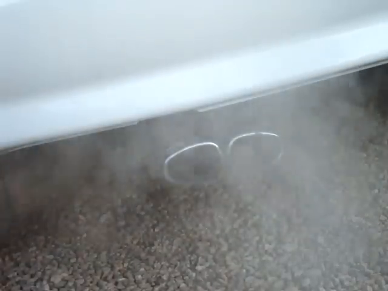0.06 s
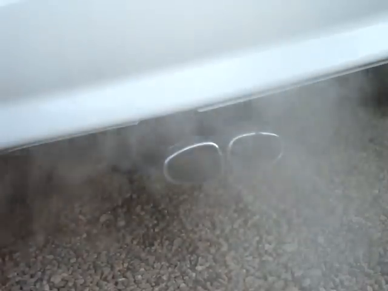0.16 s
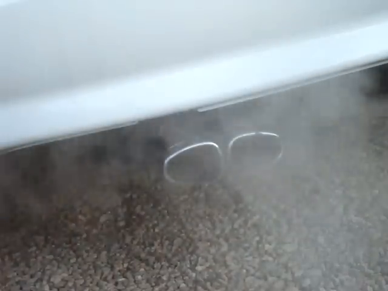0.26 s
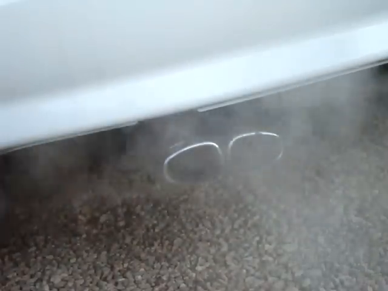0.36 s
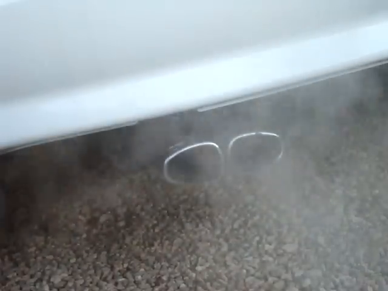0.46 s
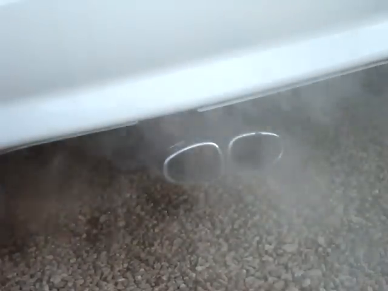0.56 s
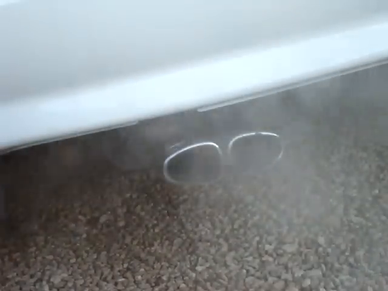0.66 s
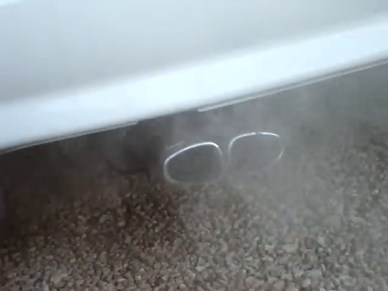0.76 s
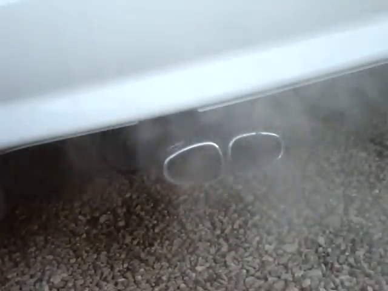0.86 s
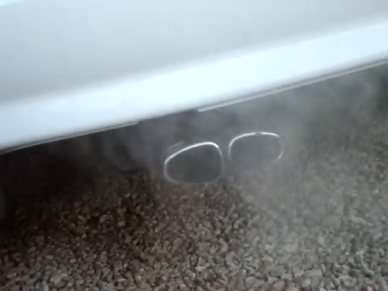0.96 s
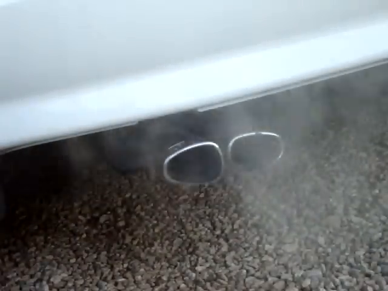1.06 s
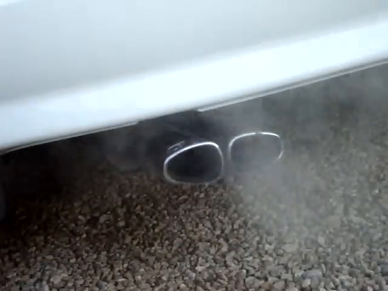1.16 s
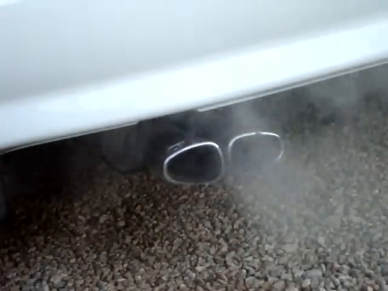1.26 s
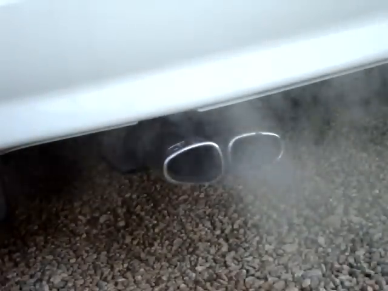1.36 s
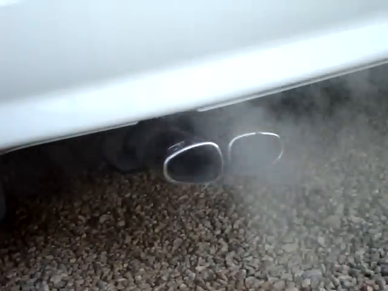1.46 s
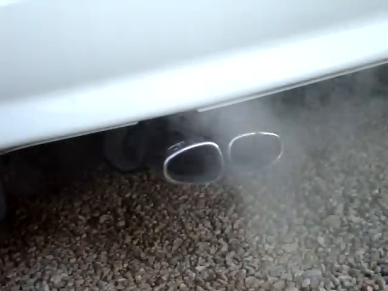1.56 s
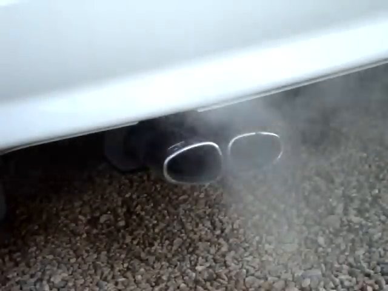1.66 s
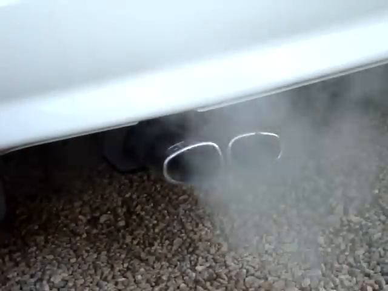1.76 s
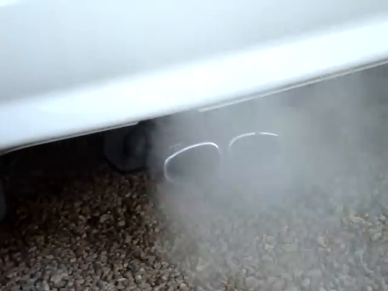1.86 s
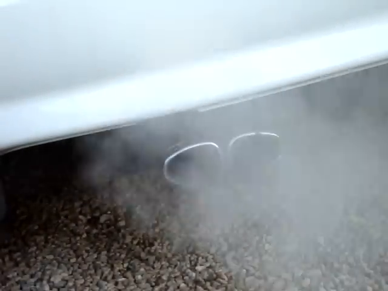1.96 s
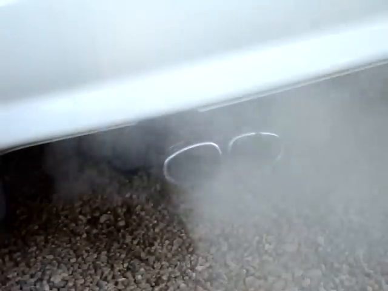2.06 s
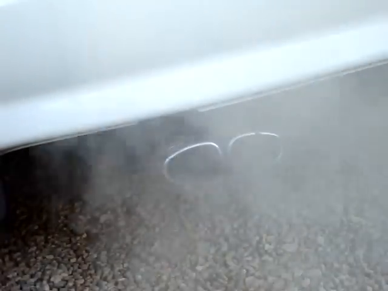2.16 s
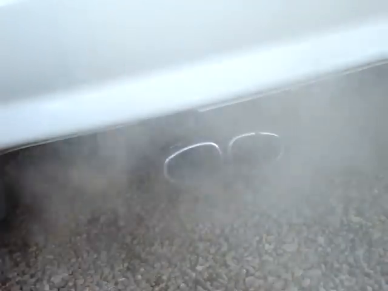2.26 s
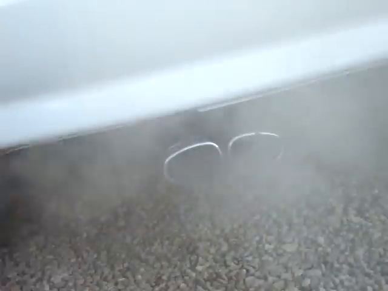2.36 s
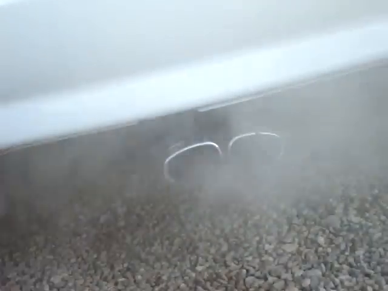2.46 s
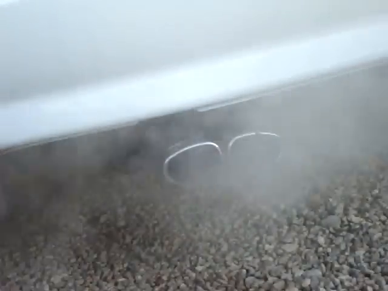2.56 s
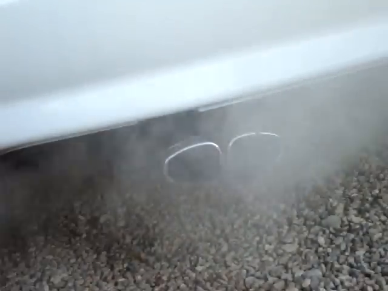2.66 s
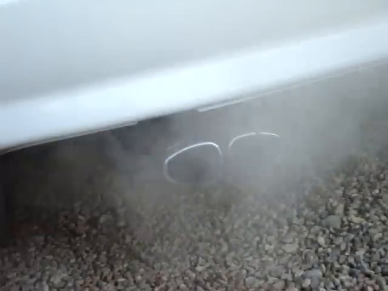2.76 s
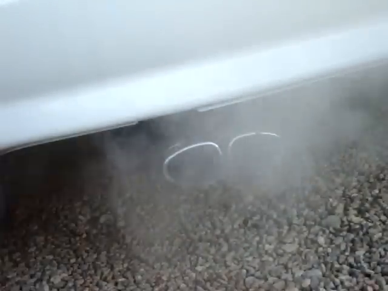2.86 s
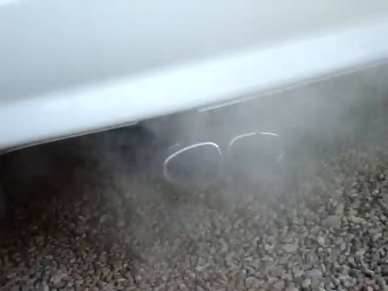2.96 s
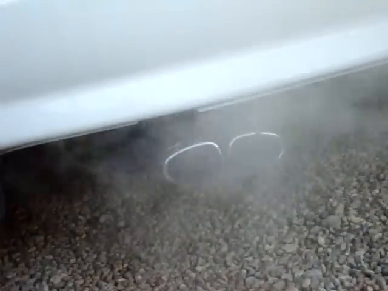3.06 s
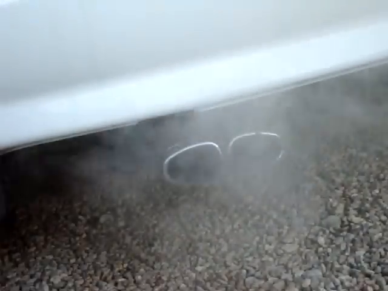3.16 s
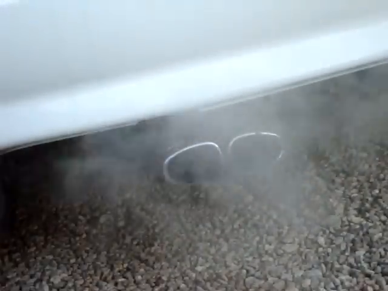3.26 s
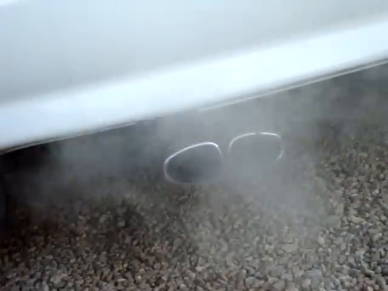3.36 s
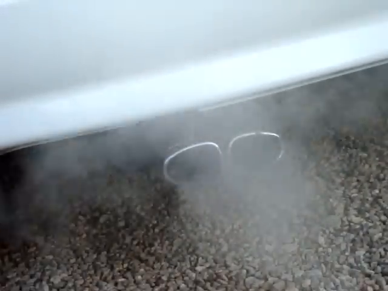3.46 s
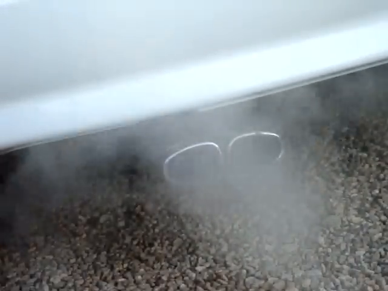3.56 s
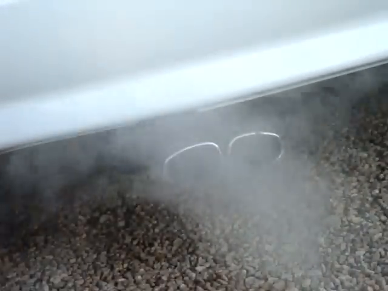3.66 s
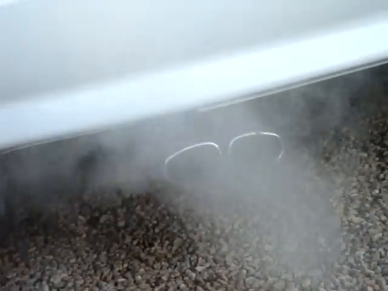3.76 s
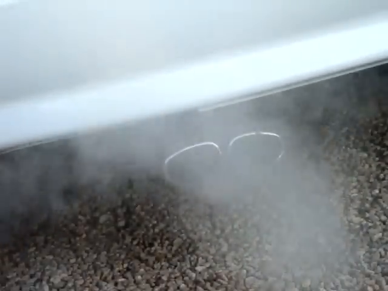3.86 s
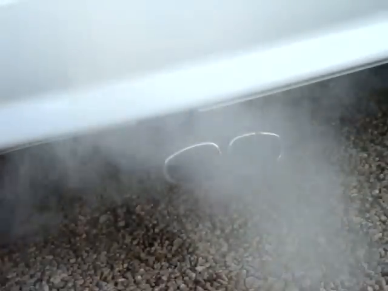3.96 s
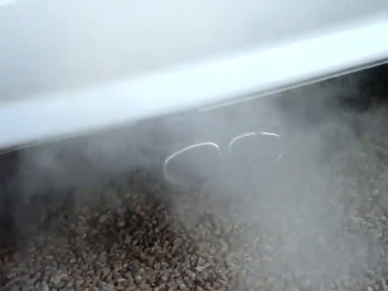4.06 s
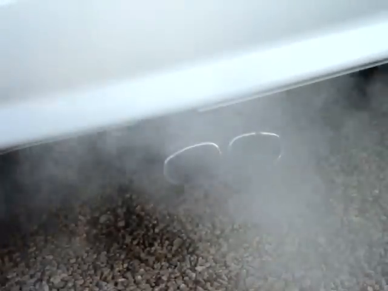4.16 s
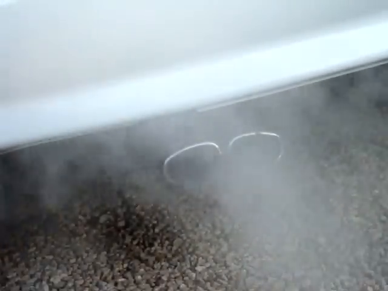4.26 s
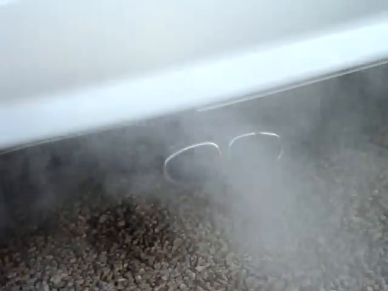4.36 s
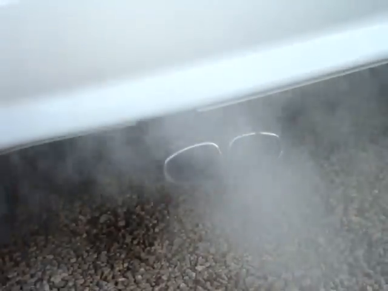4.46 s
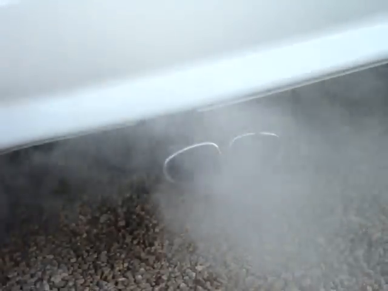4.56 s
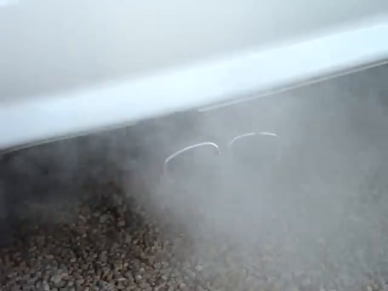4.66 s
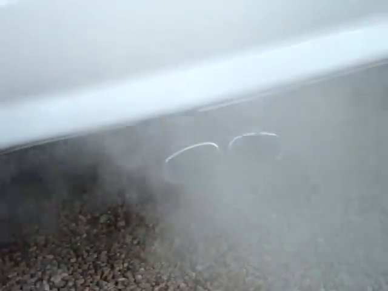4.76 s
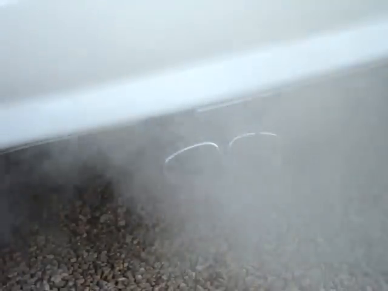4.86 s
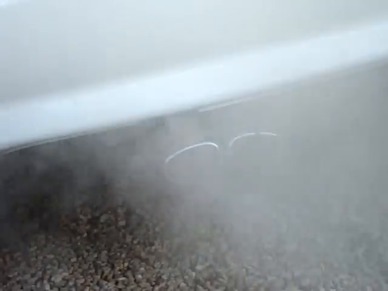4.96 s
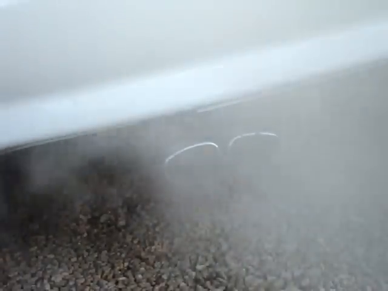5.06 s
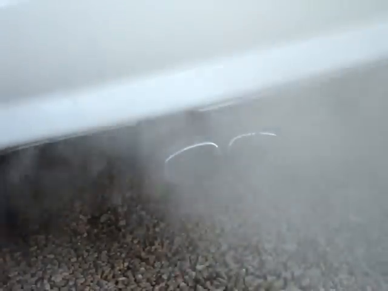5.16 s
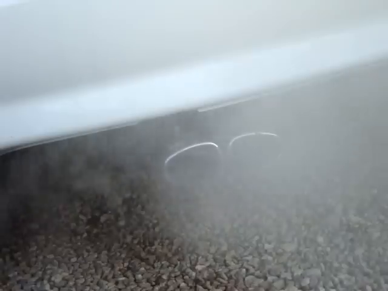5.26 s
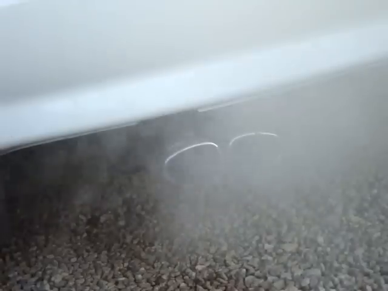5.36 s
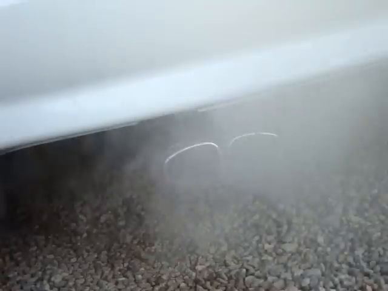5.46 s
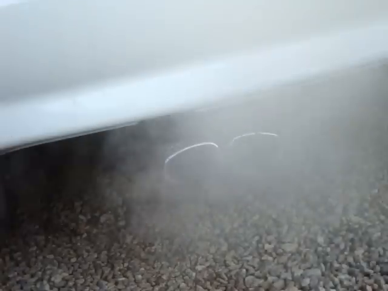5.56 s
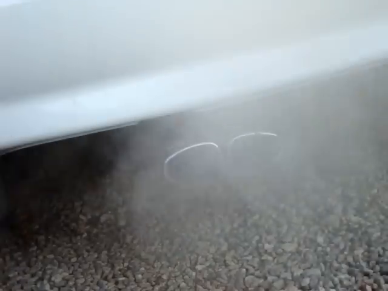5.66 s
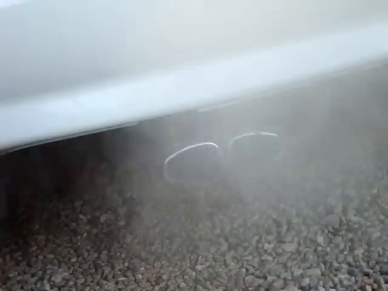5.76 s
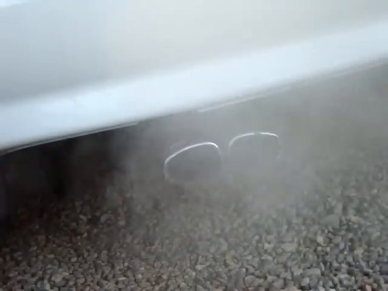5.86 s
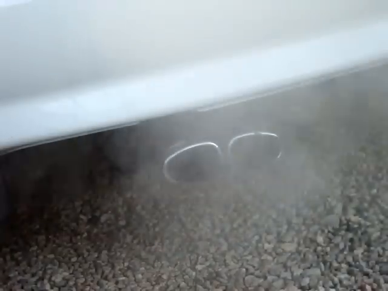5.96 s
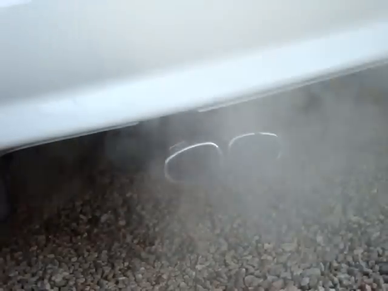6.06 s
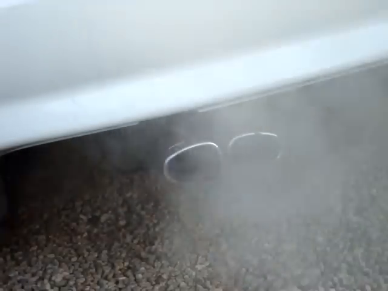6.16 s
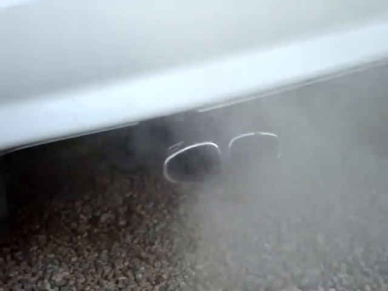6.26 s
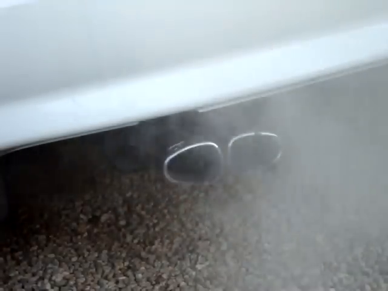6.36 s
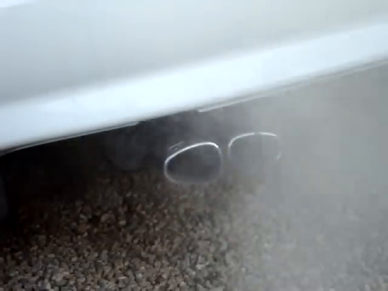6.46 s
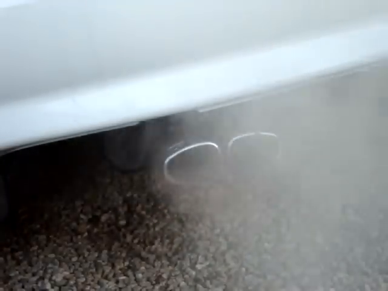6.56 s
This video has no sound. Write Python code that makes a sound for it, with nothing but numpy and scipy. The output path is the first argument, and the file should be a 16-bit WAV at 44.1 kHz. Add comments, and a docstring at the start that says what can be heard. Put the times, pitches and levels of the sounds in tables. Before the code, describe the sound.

Close outdoor exhaust: lumpy low idle, sharp crackling throttle stabs, falling growl with pops and spits, and small birds chirping in the quieter gaps.

```python
"""A four-cylinder petrol engine idles and is blipped, heard close to twin tailpipes.
Firings from two unequal banks ring silencer and pipe; gas roars in a puff a firing; steep fronts crack.
The exhaust pops, mostly on the overrun, as decaying tones with bursts of noise and a snap.
Sparrows chirp as gliding sines with echoes, over quiet outdoor air of coloured noise."""
import sys
import numpy as np
from scipy import signal
from scipy.fft import rfft, irfft
from scipy.io import wavfile
from scipy.ndimage import uniform_filter1d

SR = 44100
rng = np.random.default_rng(int(sys.argv[2]) if len(sys.argv) > 2 else 0)


def master(y):
    """Save y as 16-bit WAV."""
    cut = np.clip(np.atleast_2d(y).T, -1, 1)
    pcm = np.round(cut * 32767)  # scale
    wavfile.write(sys.argv[1], SR, pcm.astype(np.int16))


N = 291501  # samples
IDLE_HZ, IDLE_TONE_DB, IDLE_CRACK_DB = 27.7, -35, -72  # reference idle: firing rate, control levels


def undb(db):
    """Logarithmic level: amplitude gain of a level in dB."""
    return 10 ** (np.asarray(db) / 20)


def unit(x):
    """Normalisation: scales a signal to rms 1."""
    return x / np.sqrt(np.mean(x ** 2))


def ring(x, hz, width_hz):
    """Resonance: one damped mode with gain 1 at its centre."""
    return signal.lfilter(*signal.iirpeak(hz, hz / width_hz, SR), x)


def high(x, hz):
    """High-pass filtering: a steep fourth-order cut below hz."""
    return signal.sosfilt(signal.butter(4, hz, "high", fs=SR, output="sos"), x)


def low_pass(x, hz):
    """Low-pass filtering: a gentle second-order cut above hz."""
    return signal.sosfilt(signal.butter(2, hz, fs=SR, output="sos"), x)


def body(x, modes):
    """Modal superposition: neighbours have opposite sign so that the valleys stay shallow."""
    total = 0
    for k, (hz, width_hz, db) in enumerate(modes):
        total = total + (-1) ** k * undb(db) * ring(x, hz, width_hz)
    return total


def coloured(points):
    """Spectral shaping: white noise weighted by (f/Hz, level/dB) points, then set to rms 1."""
    hz, db = np.transpose(points)
    bins = np.arange(1, N // 2 + 2) * SR / N
    gain = undb(np.interp(np.log(bins), np.log(hz), db))
    return unit(irfft(rfft(rng.standard_normal(N)) * gain, N))


def walk(rate):
    """Slow random modulation: normal values drawn rate times a second, joined by slopes."""
    k = int(SR / rate)
    held = np.repeat(rng.standard_normal(N // k + 1), k)
    return uniform_filter1d(held, k)[:N]


def spikes(times, sizes):
    """Impulse train: each impulse is shared between two samples to keep its exact moment."""
    at = np.clip(np.asarray(times) * SR, 0, N - 2)
    whole = at.astype(int)
    part = at - whole
    return np.bincount(whole, sizes * (1 - part), N) + np.bincount(whole + 1, sizes * part, N)


def fade(x, seconds):
    """Exponential decay: each impulse becomes a tail with this time constant."""
    return signal.lfilter([1], [1, -np.exp(-1 / (seconds * SR))], x)


def track(points):
    """Linear interpolation of (t/s, value) points over the scene."""
    return np.interp(np.arange(N) / SR, *np.transpose(points))


# spectrum of the outdoor air: f/Hz, relative level/dB per Hz
AIR_SPECTRUM = [(20, -3.5), (100, -12), (400, -1), (1000, -39.5), (2800, -11.5), (4000, -21), (6000, -21),
                (10000, -28.5)]
AIR_DB = -52


def outdoor_air():
    """Broadband noise: coloured air whose level flickers slightly."""
    return undb(AIR_DB + walk(28)) * coloured(AIR_SPECTRUM)


# notes of the sparrow calls: t after the start/s, length/s, from f/Hz, middle f/Hz, to f/Hz,
# relative level/dB
LEAD_NOTES = [(0, 0.1, 4070, 4050, 4010, -6), (.085, 0.051, 3450, 3350, 3200, -4)]
FALL_NOTES = [(0, 0.079, 4320, 4560, 3930, -5), (.03, 0.14, 3370, 3400, 3550, -11)]
FORK_NOTES = [(0, 0.06, 4150, 3760, 3120, -1.5), (.01, 0.022, 4630, 4620, 4800, 1.5),
              (.06, .035, 3950, 3920, 3900, -5)]
STEPS_NOTES = [(0, 0.058, 4700, 4500, 4130, -0.5), (.07, 0.024, 3220, 3370, 3300, 7),
               (.097, .025, 3540, 3500, 3350, -6), (.116, 0.0385, 2775, 3100, 2550, 5.5)]
ARCH_NOTES = [(0, 0.07, 3450, 3686, 4500, -2), (.04, 0.11, 4610, 4600, 3980, -1.6),
              (.075, .04, 4320, 3800, 3250, -2)]
HOOK_NOTES = [(0.0044, 0.035, 2820, 3160, 2970, 0)]
DUET_NOTES = [(0, 0.064, 4180, 4480, 4810, -1.5), (.02, 0.071, 4100, 3960, 4300, -15),
              (.05, 0.054, 3080, 3390, 3650, -1.5), (.085, .015, 4500, 4350, 4300, -5),
              (.1, 0.033, 3450, 2950, 2850, 3)]
# calls of each kind: t/s, relative level/dB
LEAD_CALLS = [(1.046, -44), (2.51, -42.5), (3.829, -38.5), (4.41, -40)]
FALL_CALLS = [(0.191, -42), (1.154, -41.5)]
FORK_CALLS = [(3.898, -39)]
STEPS_CALLS = [(4.223, -42.5)]
ARCH_CALLS = [(5.9, -40)]
HOOK_CALLS = [(.292, -45), (1.252, -38.5), (4.914, -42)]
DUET_CALLS = [(2.597, -42.5)]


def sparrows():
    """Frequency modulation: short gliding whistles with a hoarse flutter, blurred by garden echoes."""
    kinds = [(LEAD_NOTES, LEAD_CALLS), (FALL_NOTES, FALL_CALLS), (FORK_NOTES, FORK_CALLS),
             (STEPS_NOTES, STEPS_CALLS), (ARCH_NOTES, ARCH_CALLS), (HOOK_NOTES, HOOK_CALLS),
             (DUET_NOTES, DUET_CALLS)]
    song = np.zeros(N)
    flutter_hz = 150 * walk(350)
    for notes, calls in kinds:
        for start, call_db in calls:
            for lag, length, *glide, note_db in notes:
                a, n = int((start + lag) * SR), int(length * SR)
                hz = np.interp(np.linspace(0, 2, n), [0, 1, 2], glide) + flutter_hz[a:a + n]
                whistle = np.sqrt(2 * np.hanning(n)) * np.sin(2 * np.pi * np.cumsum(hz) / SR)
                song[a:a + n] += undb(call_db + note_db) * whistle
    song *= undb(5 * walk(160))  # the throat catches and breaks the notes up
    age = np.arange(int(.2 * SR)) / SR
    echo = unit(rng.standard_normal(len(age))) * np.exp(-age / .03) * undb(-34)
    return .35 * song + signal.fftconvolve(song, echo)[:N]


def snap(x):
    """Shock-front waveform: a short suck, then a sharper push."""
    t = np.arange(-60, 61) / SR
    width_s = np.where(t < 0, .0008, .00033)
    shape = np.where(t < 0, .6, 1) * t / width_s * np.exp(.5 - (t / width_s) ** 2 / 2)
    return low_pass(np.convolve(x, shape, "same"), 3000)


# tips and shell that a sharp front rings: f/Hz, width/Hz, relative level/dB
SHELL_MODES = [(1080, 210, -16.5), (1370, 39, 5), (1626, 65, 6.5), (1930, 54, 1.5), (2209, 27, 8),
               (2640, 230, 3.5), (2950, 220, 1.5), (3450, 180, -4), (3860, 260, -9), (4810, 710, -10),
               (6700, 2400, -22)]
# exhaust pops: t/s, relative boom level/dB, boom t60/s, relative spit level/dB, relative snap level/dB
EXHAUST_POPS = [(2.457, -15, 0.076, -42, -25), (2.563, -17.5, 0.16, -49, -33),
                (2.664, -19, 0.075, -52, -39), (2.779, -33, 0.045, -49, -45), (3.89, -10, 0.1, -40, -20),
                (5.247, -14.5, 0.2, -23.5, -11), (5.2778, -10.5, 0.12, -16.5, -18),
                (5.292, -29, .06, -30, -28), (5.308, -17.5, 0.21, -40, -29), (5.329, -18, 0.1, -22, -9),
                (5.478, -9.5, 0.14, -36, -32), (5.54, -11, 0.025, -25, -7), (5.565, -30, 0.064, -32, -28),
                (5.581, -8, 0.058, -29, -34), (5.601, -12, 0.08, -48, -34), (5.666, -31, 0.04, -24.5, -31),
                (5.836, -16, 0.085, -44, -25)]
BOOM_HZ, SPIT_TOP_HZ, SPIT_S = 275.2, 4200, .007


def pops():
    """Transient excitation: late bangs give a decaying pipe tone, a burst of rasping gas and a snap."""
    s, _, _, spit_db, snap_db = np.transpose(EXHAUST_POPS)
    boom = np.zeros(N)
    for at, boom_db, t60, _, _ in EXHAUST_POPS:
        a = int(at * SR)
        age = np.arange(min(int(t60 * SR), N - a)) / SR
        boom[a:a + len(age)] += undb(boom_db - 60 * age / t60) * np.sin(2 * np.pi * BOOM_HZ * age)
    bang = spikes(s, undb(spit_db))
    gas = 1.5 * bang + fade(bang, SPIT_S) * rng.standard_normal(N)
    spit = body(gas, SHELL_MODES) + undb(9) * ring(gas, 890, 640) + undb(-13.5) * gas
    spit = low_pass(low_pass(high(spit, 450), SPIT_TOP_HZ), SPIT_TOP_HZ)
    return high(boom + snap(spikes(s, undb(snap_db))), 205) + spit


# stabs of the pedal: pressed t/s, eased t/s, lifted t/s, crack control level/dB when wide open, when eased
PEDAL_STABS = [(1.638, 1.983, 2.38, -44, -59), (4.434, 4.794, 5.17, -43, -55),
               (5.912, 6.265, 6.65, -42.5, -52)]
# crack between the stabs (idle, one slow squeeze, overrun): t/s, control level/dB
RESTING_CRACK = [(0, -72), (2.5, -78.5), (3.05, -73.5), (3.9, -60), (4.45, -67), (5.3, -65), (5.56, -60),
                 (5.85, -73.5)]
OPEN_S, EASE_S, LIFT_S = 0.13, 0.21, 0.03  # how long each pedal movement takes
SHUT_DB, SAG_DB = -72.5, -0.5  # crack control with the pedal shut; its change while eased


def crack_level(t):
    """Envelope control: a stab opens fast, holds, eases and shuts; the higher of stab and rest rules."""
    levels = [np.interp(t, *np.transpose(RESTING_CRACK))]
    for press, ease, lift, open_db, eased_db in PEDAL_STABS:
        moments = [press, press + OPEN_S, ease, ease + EASE_S, lift, lift + LIFT_S]
        db = [SHUT_DB, open_db, open_db, eased_db, eased_db + SAG_DB, SHUT_DB]
        levels.append(np.interp(t, moments, db))
    return np.max(levels, axis=0)


def eased(t):
    """Envelope control: 1 while the pedal is eased back after a stab, 0 elsewhere, with ramps."""
    return sum(np.interp(t, [ease, ease + EASE_S, lift, lift + EASE_S], [0, 1, 1, 0])
               for _, ease, lift, _, _ in PEDAL_STABS)


# moments at which the engine stumbles and its tone dips: t/s, dip level/dB
STUMBLES = [(2.902, -11), (5.929, -8)]
STUMBLE_S = 0.062


def overrun(t):
    """Envelope control: 1 from a lift of the pedal to its stumble, while the fuel is cut; 0 elsewhere."""
    return sum(np.interp(t, [lift, lift + LIFT_S, at, at + STUMBLE_S], [0, 1, 1, 0])
               for (_, _, lift, _, _), (at, _) in zip(PEDAL_STABS, STUMBLES))


# engine course: t/s, firing rate f/Hz, pipe tone level/dB before stumbles
ENGINE_COURSE = [(0.0, 27.59, -36), (0.959, 28.16, -34), (1.669, 27.78, -36.5), (1.841, 41.15, -21.5),
                 (1.898, 47.27, -21.5), (2.042, 55.84, -16), (2.15, 55.9, -19.5), (2.225, 55.67, -19.5),
                 (2.309, 53.55, -17), (2.351, 51.69, -23.5), (2.5, 44.51, -28), (2.777, 33.81, -29.5),
                 (2.911, 31.58, -34), (3.04, 31.07, -34.5), (3.241, 33.6, -32.5), (3.719, 39, -26),
                 (3.849, 40.4, -27.5), (3.921, 38.79, -22), (4.119, 34.5, -25), (4.4, 29.83, -31.5),
                 (4.468, 32.23, -28), (4.621, 49.87, -19), (4.822, 68.3, -23), (4.871, 69.74, -21),
                 (4.953, 70.9, -21), (5.12, 67.31, -21.5), (5.193, 65.2, -29), (5.298, 56.16, -24.5),
                 (5.45, 48.76, -26), (5.693, 38.79, -35), (5.838, 35.13, -29), (5.981, 32.51, -36),
                 (6.039, 36.3, -28), (6.092, 47, -21), (6.15, 49.22, -21.5), (6.294, 66.13, -23),
                 (6.391, 68.5, -21.5), (6.444, 68.42, -18.5), (6.536, 66.4, -19.5), (6.61, 66, -32)]
# gas roar: t/s, level/dB before stumbles
GAS_FLOW = [(0, -42), (1.68, -41), (1.9, -25.5), (2.06, -35.5), (2.32, -35), (2.45, -41), (2.91, -38.5),
            (3.24, -36), (3.72, -34), (3.9, -32), (4.47, -31), (4.62, -28), (4.75, -33), (5.12, -38.5),
            (5.19, -38.5), (5.3, -35), (5.42, -37), (5.52, -34.5), (5.86, -36.5), (6.04, -34),
            (6.16, -28.5), (6.26, -35.5), (6.48, -36.5), (6.61, -37.5)]
# how a layer follows the controls: level/dB at idle, dB per dB of pipe tone, dB per dB of crack,
# dB per octave of speed, dB on the overrun, dB per dB of resting crack
DRONE_LAW = (-36, 0.22, 0.4081, -11.5, -2, 0.0847)
LOPE_LAW = (-35, 0.415, 0.3388, -16.5, -3.5, 0.02)
THUMP_LAW = (-58, 0.28, 0.7427, -11, 3, 0.5)


def controls():
    """Linear level laws: speed, pipe tone and pedal set the layers; a stumble dips the pulses."""
    t = np.arange(N) / SR
    s, hz, tone_db = np.transpose(ENGINE_COURSE)
    hz, tone_db, crack_db = np.interp(t, s, hz), np.interp(t, s, tone_db), crack_level(t)
    dip_db = sum(db * np.exp(-((t - at) / STUMBLE_S) ** 2) for at, db in STUMBLES)
    drivers = [np.ones(N), tone_db - IDLE_TONE_DB, crack_db - IDLE_CRACK_DB, np.log2(hz / IDLE_HZ),
               overrun(t), track(RESTING_CRACK) - IDLE_CRACK_DB]
    drone_db = np.dot(DRONE_LAW, drivers) + dip_db
    lope_db = np.dot(LOPE_LAW, drivers) + dip_db / 2
    thump_db = np.dot(THUMP_LAW, drivers)
    roar_db = track(GAS_FLOW) + dip_db / 6
    return hz, tone_db + dip_db, drone_db, lope_db, thump_db, roar_db, crack_db


# moments at which a firing of the louder bank leaves the pipe: t/s
LOUD_BANK_TIMES = [.157, .597, 1.028, 1.243, 1.461, 1.605, 1.76, 1.817, 1.907, 1.985, 3.073, 3.428, 3.591,
                   4.052, 4.232, 4.421, 4.55, 4.673, 4.739, 4.859, 6.025, 6.16, 6.325]


def firing_times(hz):
    """Phase integration: two firings a crank turn; it slips gently so a turn starts at each marked moment."""
    t = np.arange(N) / SR
    turns = np.cumsum(hz / 2) / SR
    marked = np.interp(LOUD_BANK_TIMES, t, turns)
    slip = np.unwrap(marked - np.round(marked), period=1)
    turns = turns - np.interp(t, LOUD_BANK_TIMES, slip)
    count = np.arange(np.ceil(2 * turns[0]), 2 * turns[-1]).astype(int)
    return np.interp(count / 2, turns, t), count


# size of each firing in the cycle: relative level/dB
CYLINDER_SIZES = [0, -.8, -.4, -1.2]
# scatter: steady gas at idle (less at speed), overrun, extra per Hz/s of rising speed
STEADY_DB, OVERRUN_DB, RISING_DB = 1.2, 2.1, .007
ROUGH_BELOW_HZ = 64  # on the overrun the burning turns uneven only under this firing rate


def uneven_firings(hz):
    """Stochastic modulation: uneven burning changes both size and moment of a firing."""
    times, count = firing_times(hz)
    samples = np.arange(N)
    rate = np.interp(times * SR, samples, hz)
    slope = np.interp(times * SR, samples, uniform_filter1d(np.gradient(hz), size=4000) * SR)
    rough = (overrun(times) > .5) & (rate < ROUGH_BELOW_HZ)
    burning_db = STEADY_DB * IDLE_HZ / rate + RISING_DB * np.maximum(slope, 0)
    uneven_db = np.where(rough, OVERRUN_DB, burning_db)
    late, strong = rng.standard_normal((2, len(times)))
    size = undb(np.take(CYLINDER_SIZES, count % 4) + uneven_db * strong)
    return times + .00008 * uneven_db * late, count, rate, size


# silencer chambers: round trip t/s, reflected share
CHAMBER_WALLS = [(.0047, 0.8), (.0083, -0.36)]


def chambers(x):
    """All-pass reflection: silencer walls hold part of each pulse back without colouring it."""
    for lag_s, share in CHAMBER_WALLS:
        lag = int(lag_s * SR)
        rows = np.pad(x, (0, -N % lag)).reshape(-1, lag)  # one row a round trip
        x = signal.lfilter([-share, 1], [1, -share], rows, axis=0).ravel()[:N]
    return x


# the far end of the pipe sends each pulse back inverted: round trip, share
RETURN_S, RETURN = .018, 0.31


def bank_contrast(times, count, size, per_firing):
    """Subharmonic excitation: a push up for one bank and down for the other sounds half the firing rate."""
    contrast = spikes(times, size * (-1.) ** count) * per_firing
    return contrast - RETURN * np.roll(contrast, int(RETURN_S * SR))


# at low speed the pipe tone chokes once a turn, just after the weaker bank: lag, length, share at idle
CHOKE_LAG_S, CHOKE_S, CHOKE = 0.0051, 0.0051, 0.34


def choked(times, count, rate):
    """Amplitude modulation: a brief dip of gain once a turn, shallower as speed rises."""
    weak = count % 2 == 1
    lost = np.minimum(CHOKE * (IDLE_HZ / rate[weak]) ** 2, 1)
    bell = np.exp(-(np.arange(-800, 801) / (CHOKE_S * SR)) ** 2)
    return 1 - np.convolve(spikes(times[weak] + CHOKE_LAG_S, lost), bell, "same")


# pipe, silencer, and resonances rung by the difference of the two headers:
# f/Hz, width/Hz, relative level/dB
PIPE_MODES = [(245.8, 37.1, -3), (280, 26.5, 6), (288.7, 58, -5)]
SILENCER_MODES = [(132.3, 10.1, -4), (195.2, 12.6, 2.5)]
HEADER_MODES = [(216.8, 13.7, 6.5), (248.3, 17.8, 12.5), (302, 29, 5.5), (495.6, 28, -2.5)]
HUM_DB, HUM_HZ, HUM_WIDTH_HZ = -14, 162, 105  # lowest firing tones, against the pipe tone at 60 firings/s


def low_tones(firings, contrast, choke, hz, tone_db, drone_db, lope_db, thump_db):
    """Forced resonance: firing pulses ring pipe and silencer, their bank difference the headers."""
    tone = unit(high(body(firings, PIPE_MODES), 137))
    drone = unit(high(body(firings, SILENCER_MODES), 110))
    # the bank difference reaches the tips a little after the firing itself
    lope = unit(np.roll(high(body(contrast, HEADER_MODES), 210), int(.02 * SR)))
    thump = unit(ring(ring(firings, 68, 26), 68, 26))
    hum = unit(ring(ring(firings, HUM_HZ, HUM_WIDTH_HZ), HUM_HZ, HUM_WIDTH_HZ))
    pulsed = undb(tone_db) * tone + undb(drone_db) * drone + undb(lope_db) * lope
    return choke * pulsed + undb(thump_db) * thump + undb(tone_db + HUM_DB) * (hz / 60) ** 2 * hum


# narrow ring of the tailpipe wall: t/s, relative level/dB
WALL_LEVEL = [(0.0, -62), (0.09, -50.5), (1.67, -61.5), (1.93, -25), (2.02, -30.5), (2.32, -25),
              (2.94, -58.5), (2.98, -51), (3.34, -54), (3.86, -42), (4.47, -55), (4.61, -24.5), (5.24, -35),
              (5.29, -22), (5.39, -41), (5.5, -31.5), (5.94, -58), (6.09, -28.5), (6.34, -23.5), (6.6, -51)]
WALL_HZ, WALL_WIDTH_HZ = 528, 12


def wall(pulses):
    """Narrow-band resonance: pulses and gas ring one mode of the tailpipe wall."""
    driven = unit(ring(pulses, WALL_HZ, 60))
    blown = unit(ring(rng.standard_normal(N), WALL_HZ, 60))
    hum = ring(driven + 0.3 * blown, WALL_HZ, WALL_WIDTH_HZ)
    hum = hum / np.sqrt(uniform_filter1d(hum ** 2, size=4000))  # evens out its level
    return undb(track(WALL_LEVEL) - 2.0) * hum


# broad resonances through which the firing tones leave the tailpipes: f/Hz, width/Hz, relative level/dB
GROWL_MODES = [(307.6, 10.7, 7.5), (406.6, 43, 0.5), (461.8, 24.7, 3.5), (524.5, 24, 0), (647.4, 37, -3),
               (801, 59, -4.5), (925, 42, -6), (1053, 77, -5.5)]
GROWL_DB = 9  # over the gas roar at 60 firings a second
GROWL_POWER, GROWL_BANKS = 2.75, 1.07  # growth with speed, share of the bank difference
BANKS_TOP_HZ = 547  # the bank difference is a soft push: it fades above this pitch


def growl(firings, contrast, hz):
    """Power-law growth: at speed the firing tones outgrow the gas noise in the tailpipes."""
    pushes = firings + GROWL_BANKS * low_pass(contrast, BANKS_TOP_HZ)
    return unit(high(body(pushes, GROWL_MODES), 311)) * (hz / 60) ** GROWL_POWER * undb(GROWL_DB)


# spectrum of the gas: f/Hz, relative level/dB per Hz
GAS_SPECTRUM = [(240, 16), (400, -9.5), (462, -16), (700, -13.5), (1060, -11), (2070, -23), (4010, -36),
                (9000, -59), (11700, -100.5)]
# upper resonances of the tailpipes: f/Hz, width/Hz, relative level/dB
TAILPIPE_MODES = [(420, 44, -21), (448, 46, -5), (536.7, 6.4, 2.5), (650, 5.6, -3), (785, 13, -17.5),
                  (1030, 15, -21.5)]
HISS_FROM_HZ = 400


def gas_roar(times, size):
    """Turbulent jet noise: a steady flow with one decaying puff a firing, coloured by the tailpipes."""
    puffs = .5 + fade(spikes(times, size), 0.047)
    gas = coloured(GAS_SPECTRUM)
    jet = high(gas + undb(12.0) * body(gas, TAILPIPE_MODES), HISS_FROM_HZ)
    return unit(puffs * undb(0.13 * walk(12)) * jet)


# sharpness of each firing in the cycle: relative level/dB
FRONT_SHARPNESS = [0, -5, -2, -5]


def steep_fronts(times, count):
    """Impulsive radiation: one front a firing, its sharpness scattered by 2 dB."""
    return spikes(times, undb(np.take(FRONT_SHARPNESS, count % 4) + 2.0 * rng.standard_normal(len(times))))


# the hardest single firings: t/s, relative peak level/dB
HARDEST_FIRINGS = [(1.865, -12), (1.907, -6), (1.927, -10), (1.947, -10), (1.986, -10), (4.551, -9),
                   (4.596, -8), (4.617, -4), (4.637, -10), (4.673, -10), (4.707, -10), (4.74, -9),
                   (4.802, -12), (4.86, -11), (6.141, -8), (6.16, -10), (6.18, -8), (6.198, -10),
                   (6.326, -10)]
HARD_CRACK_DB = 1.5  # lift of the hardest firings within the crack
SPRAY_S, CLICK = 0.0057, 2.03  # decay of the spray behind a front, weight of the bare click
SWELL_S, BLOW_S = .004, 0.012  # the hot gas swells and blows this long
HISS_DB, HISS_OCTAVE_DB = -20.5, -13.5  # hiss gain at idle, change per octave of speed
# once the pedal eases the puffs merge: share that stays pulsed, added steady share
EASED_PULSED, EASED_STEADY = 0.55, 0.33


def crack(fronts, hz, steep, per_firing):
    """Impulse and jet-noise excitation: fronts click, spray and blow hot gas that rings the shell."""
    s, peak_db = np.transpose(HARDEST_FIRINGS)
    sharp = fronts + spikes(s, undb(peak_db + HARD_CRACK_DB))
    spray = fade(sharp, SPRAY_S) - fade(sharp, 0.0007)  # sprays at once and thins out
    age = np.arange(1300) / SR
    swell = np.minimum(age / SWELL_S, 1) * np.exp(-(age / BLOW_S) ** 4)
    blow = np.convolve(fronts, swell)[:N]
    ease = eased(np.arange(N) / SR)
    pulsed = 1 - (1 - EASED_PULSED) * ease
    steady = 0.012 + EASED_STEADY * ease
    gas = 0.17 * rng.standard_normal(N) * (pulsed * (steep * spray + 0.34 * blow) + steady)
    rasp = CLICK * steep * pulsed * sharp + gas
    hiss = high(0.25 * rng.standard_normal(N) * (pulsed * blow + steady), 3200)
    hiss = undb(HISS_DB + HISS_OCTAVE_DB * np.log2(hz / IDLE_HZ)) * hiss
    return unit(body(rasp * per_firing, SHELL_MODES) + hiss * per_firing)


def shock(fronts, steep, crack_db):
    """Nonlinear steepening: only strong firings form a shock, so it grows faster than the crack."""
    s, peak_db = np.transpose(HARDEST_FIRINGS)
    regular = undb(1.364 * crack_db + 38) * steep * snap(fronts)
    return high(regular + snap(spikes(s, undb(peak_db))), 90)


SHOCK_FULL_HZ = 48  # firing rate from which the fronts steepen fully


def exhaust(hz, tone_db, drone_db, lope_db, thump_db, roar_db, crack_db):
    """Source-filter superposition: firings ring silencer and pipe, puff out gas and send steep fronts."""
    times, count, rate, size = uneven_firings(hz)
    per_firing = 1 / np.sqrt(hz)  # keeps the power of a pulse train even over speed
    firings = chambers(spikes(times, size) * per_firing)
    contrast = bank_contrast(times, count, size, per_firing)
    choke = choked(times, count, rate)
    low = low_tones(firings, contrast, choke, hz, tone_db, drone_db, lope_db, thump_db)
    flow = undb(roar_db) * (gas_roar(times, size) + growl(firings, contrast, hz))
    fronts = steep_fronts(times, count)
    steep = np.minimum(hz / SHOCK_FULL_HZ, 1) ** 2
    cracks = undb(crack_db + 9.0) * crack(fronts, hz, steep, per_firing)
    return low + shock(fronts, steep, crack_db) + wall(firings + contrast) + flow + cracks


def scene():
    """Linear superposition: outdoor air, birds, pops and exhaust add up."""
    return (outdoor_air() + sparrows() + pops() + exhaust(*controls()))[None]


TOP_HZ = 10150


def record(dry):
    """Saturation and band limiting: a small microphone rounds the loudest peaks and cuts the top."""
    rounded = np.tanh(.6 * dry) / .6
    return signal.sosfilt(signal.ellip(10, .2, 80, TOP_HZ, fs=SR, output="sos"), rounded)


dry = scene()
out = record(dry)
master(out)
```